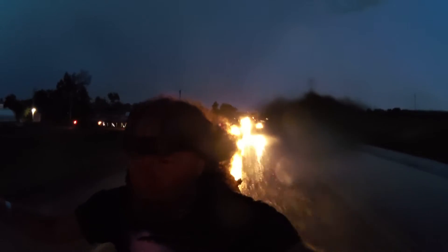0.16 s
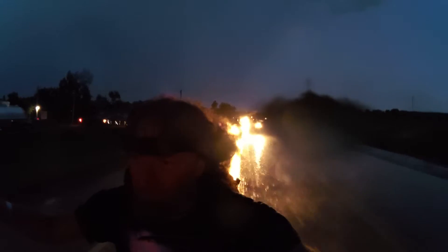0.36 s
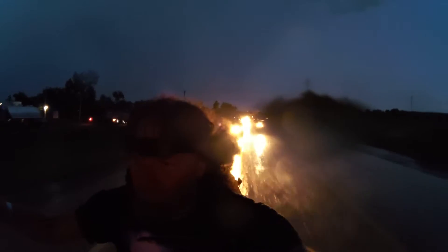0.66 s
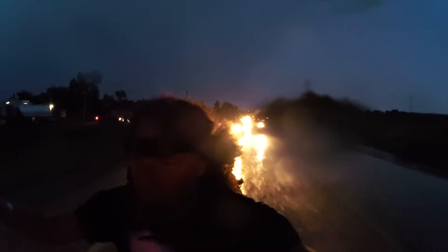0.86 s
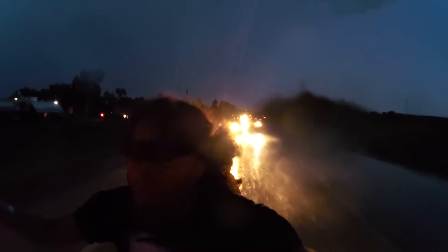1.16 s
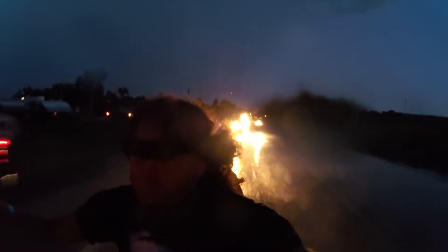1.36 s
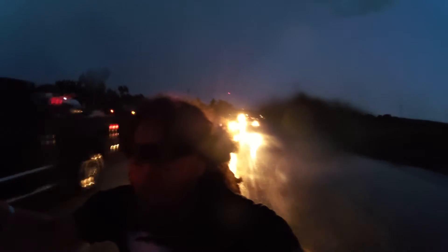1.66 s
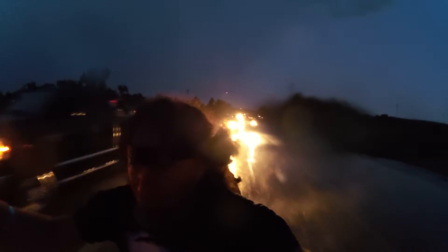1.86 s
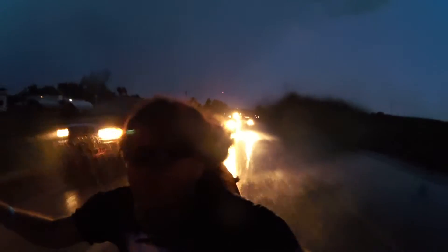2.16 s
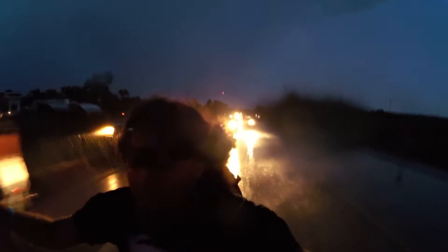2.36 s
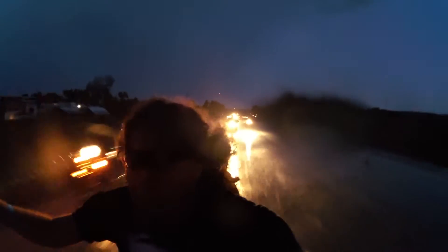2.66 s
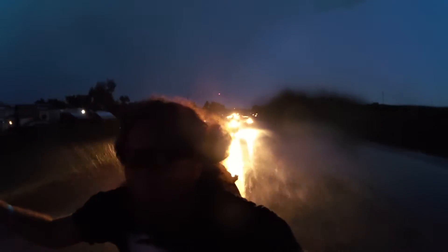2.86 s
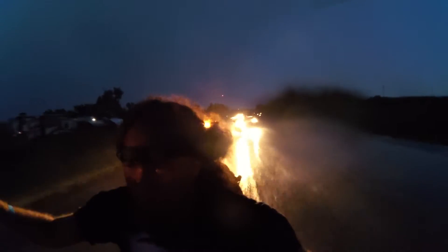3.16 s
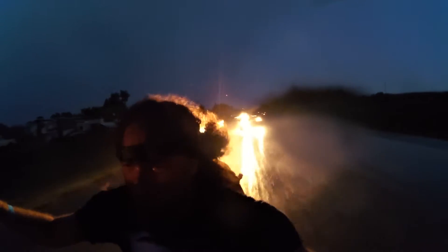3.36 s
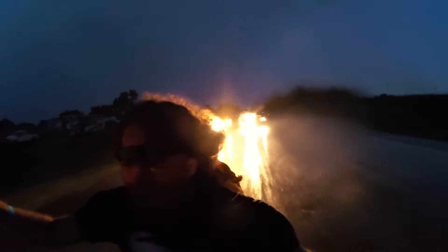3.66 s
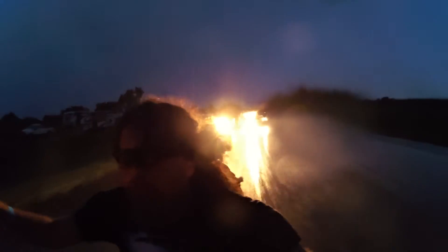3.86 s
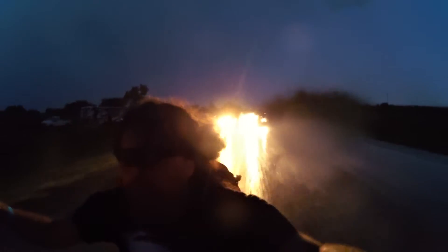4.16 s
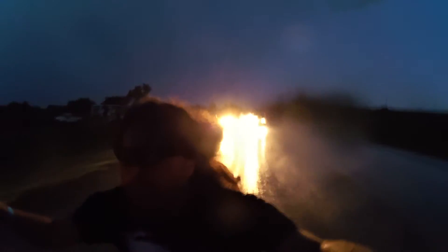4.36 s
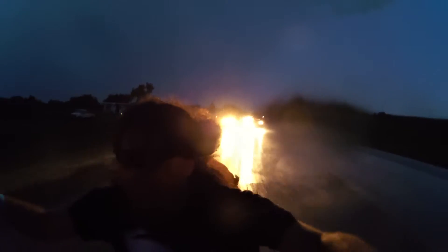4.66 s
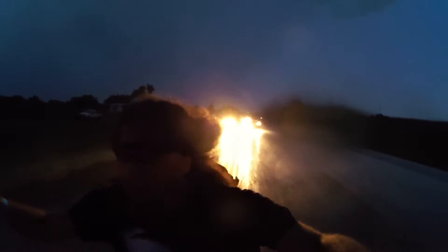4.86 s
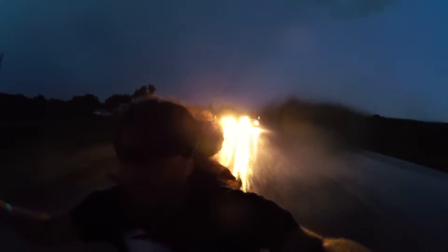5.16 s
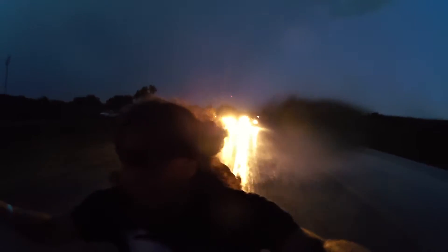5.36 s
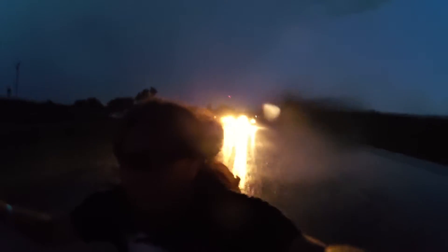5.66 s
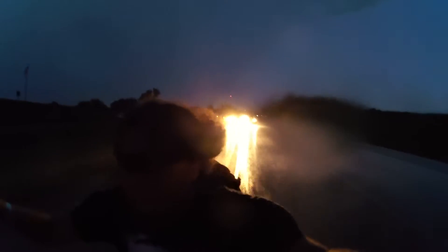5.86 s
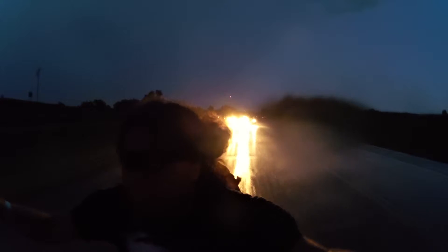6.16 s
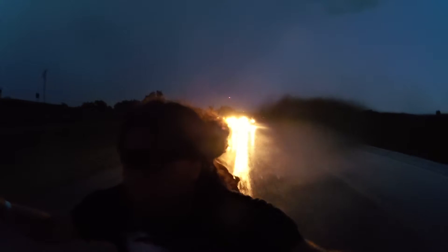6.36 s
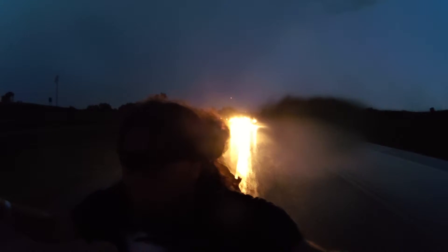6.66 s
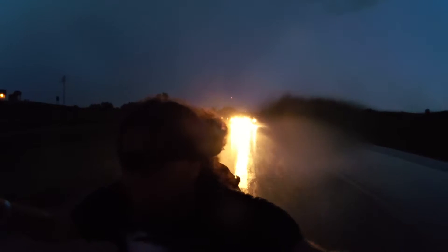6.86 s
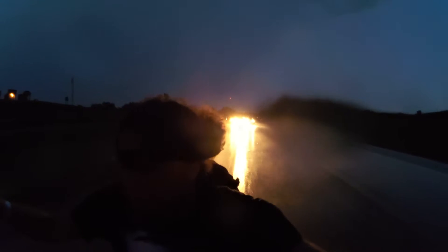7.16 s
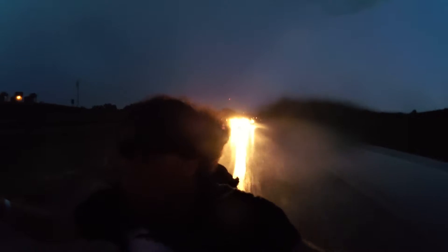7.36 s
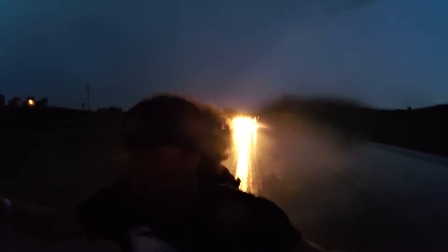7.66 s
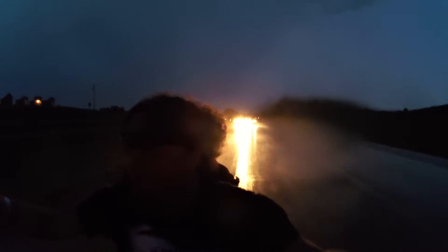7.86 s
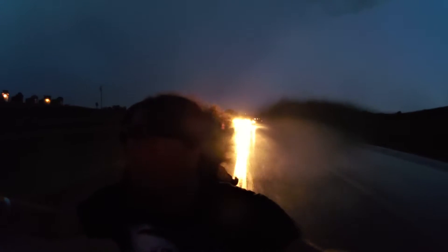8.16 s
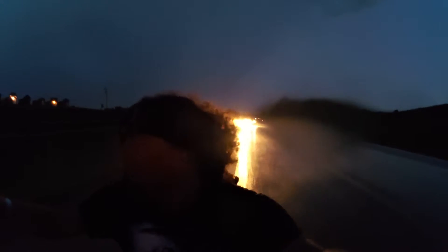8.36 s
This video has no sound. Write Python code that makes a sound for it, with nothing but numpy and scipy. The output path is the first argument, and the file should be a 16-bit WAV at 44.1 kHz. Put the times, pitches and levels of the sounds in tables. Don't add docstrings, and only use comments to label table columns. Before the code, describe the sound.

A big twin-cylinder motorcycle throbs close and muffled on a wet road, pulls harder, drops for a gear change, then cruises as raindrops tick sharply.

```python
import sys
import numpy as np
from scipy import signal
from scipy.fft import rfft, irfft, next_fast_len
from scipy.io import wavfile
from scipy.ndimage import uniform_filter1d, map_coordinates

SR = 44100
rng = np.random.default_rng(int(sys.argv[2]) if len(sys.argv) > 2 else 0)


def magnitude_from_level(level_db):
    exponent = np.asarray(level_db, float) / 20
    return 10 ** exponent


def master_out(mix):
    frames = np.transpose(np.atleast_2d(mix))
    ceiling = np.clip(frames, -1, 1)
    pcm = np.round(ceiling * 32767).astype(np.int16)
    wavfile.write(sys.argv[1], SR, pcm)


N = 376173

# (time [s], engine cycles a second [Hz])
SPEED = [(0, 16.52), (.9, 16.62), (1.2, 17.01), (1.8, 18.43), (3, 21.9), (3.6, 23.52), (4.2, 24.98),
         (4.7, 26.15), (4.78, 26), (5.17, 21), (5.33, 20.2), (5.49, 18.7), (5.7, 18.77), (6.3, 19.34),
         (6.9, 19.66), (7.5, 19.83), (8.1, 19.83), (8.53, 19.6)]
# (time [s], level [dB])
THROTTLE = [(0, -26.5), (.8, -27.5), (1.2, -21.5), (1.45, -23.5), (2.06, -20.5), (2.85, -19), (3.54, -15),
            (3.96, -17.5), (4.49, -16), (4.7, -15.5), (4.75, -26), (5.22, -31), (5.3, -19), (5.55, -22.5),
            (6.6, -23.5), (7.3, -25), (7.7, -25), (8.53, -31.5)]
# (time [s], level [dB])
SPRAY = [(0.0, -32.5), (0.12, -36), (0.52, -34), (1.09, -32), (1.85, -41.5), (2.49, -40), (4.2, -37.5),
         (4.89, -36), (5.25, -35.5), (5.61, -41), (6.06, -41), (7.82, -34), (8.2, -38), (8.53, -39)]
# (level [dB], slope [dB per dB of spray], change in a hard pull [dB], change in next gear [dB])
ROAD_LAYERS = [
    (-24, 0.13, -7, -3),
    (-30.5, .5, -2, -1),
    (-40.5, 0.75, 0.75, -1),
    (-50.5, 0.96, 1.4, 0.3),
]
# (level unloaded [dB], change at full load [dB], change in the higher gear [dB])
MESH_LEVELS = [
    (-39.5, -1, 1.8),
    (-37, -10, -3),
    (-60, -10.5, 18),
    (-43.5, -9, -2),
]
MESH_ORDERS = [(62, .5), (122.5, 1.6), (44.5, .3), (38, .4)]
# (tones per engine cycle, level [dB])
BRACKET_ORDERS = [(8, -34), (10, -23), (15, -29)]
# (part of the cycle, level [dB])
KNOCKS = [(.04, -7.5), (0.212, 1), (0.331, -1.5), (.59, -2), (.74, -0.5), (0.902, 4)]
# (time [s], length [s], part of the cycle, ring [Hz], level [dB])
TAPPETS = [(-.3, 1.75, .26, 1862, -41.5), (-.3, 2.1, 0.23, 1994, -41), (-.3, 1.9, .75, 1036, -43.5),
           (-.3, 1.7, .75, 625, -39), (4.897, 1, 0.25, 1868, -41), (2.1, .7, .24, 1863, -44.5)]
# (time [s], peak [dB], crack [dB])
DROPS = [(0.142, -26, -51.5), (1.0828, -7.5, -44.5), (1.1787, -23.5, -55.5), (1.268, -24.5, -58),
         (1.281, -18.5, -60), (1.351, -22.5, -49), (1.419, -17, -45), (1.6892, -22, -48),
         (1.7447, -22, -61), (1.8915, -24.5, -68), (2.8803, -9, -42.5), (3.9458, -27, -58),
         (4.871, -27, -68), (4.9008, -24, -69), (4.94, -25, -68), (5.008, -21.5, -51),
         (5.2824, -30, -60), (5.2984, -19, -56), (5.6742, -28.5, -51), (5.98, -19, -44.5),
         (6.0323, -11.5, -52.5), (6.1928, -14, -46.5), (6.3923, -22.5, -68), (6.5158, -12.5, -50.5),
         (6.6647, -17.5, -60.5), (6.754, -23, -58), (6.995, -18.5, -55), (7.0729, -15, -45),
         (7.1157, -21.5, -48), (7.3782, -21.5, -51),
         (0.6125, -32, -48), (0.6684, -38.5, -62), (0.9033, -33, -69), (1.1573, -36, -61),
               (1.2176, -27, -54), (1.2514, -28, -56), (2.604, -28.5, -76.5), (2.6364, -42, -66),
               (2.7053, -27, -59), (3.0829, -29, -67), (3.5793, -37, -64), (3.6354, -37, -66),
               (3.9054, -40, -64), (4.1749, -29, -68), (4.3111, -33, -54), (4.8454, -37, -65),
               (5.1891, -33, -60), (5.467, -26.5, -53), (5.5583, -31, -62), (6.0781, -33, -64),
               (6.6947, -34, -64), (7.2365, -33, -60), (7.5173, -27.5, -62), (7.5901, -29, -53),
               (7.671, -27, -62), (7.6804, -23.5, -57), (7.7842, -33, -62), (7.9154, -22, -59),
               (8.3883, -27, -67), (8.4961, -19.5, -62)]
# (time [s], length [s], level [dB])
SPLASHES = [(4.868, .014, -37), (4.898, .014, -40), (4.936, .022, -41), (5.7, .026, -42),
            (4.84, 0.71, -54.5)]
# (time [s], length [s], start [Hz], end [Hz], width [Hz], level [dB])
SQUEAKS = [
    (4.761, 0.55, 244, 224.6, 14, -23),
    (4.82, .5, 1010, 835, 8, -41),
    (5.335, .095, 830, 818, 4, -28),
    (5.944, 0.058, 7250, 7400, 500, -67),
    (5.972, .031, 8100, 8200, 500, -78),
    (7.098, 0.026, 7500, 6940, 500, -69),
    (7.122, 0.028, 6570, 6200, 1200, -67),
]

PIPE = [(72.6, 17, -8), (155, 6.1, -14), (231, 50, -6), (288.1, 17, 8), (337.7, 40.2, 4.5), (378.2, 52, 3),
        (524, 12, -21.5), (592, 690, -19), (910, 230, -15)]
BOOM = [(116, 77, -15.5), (164.2, 8.05, 9), (203.3, 19, 0), (250.7, 14.6, 7.5), (362.2, 20, -0.5),
        (402.4, 25.4, -0.5)]
ROAR = [(386, 43, 1.5), (480, 30.4, 1.5), (612.4, 45, -1), (749.4, 65, 0), (862.4, 43.7, -3),
        (1079, 210, -12.5)]
WHOOSH = [(1264, 13, -11.5), (1358, 51, -1.5), (1513, 140, -2), (1844, 94, 4), (2017, 370, -7),
          (2330, 140, -4.5)]
HISS = [(3226, 320, -0.5), (3715, 130, 4), (4380, 170, -5), (4887, 240, -6)]
MESH_PANELS = [(607, 23, -0.5), (752, 12, -4), (820, 110, 0), (997, 41, 5), (1229, 20, 0), (1380, 44, -1.5),
               (1600, 40, 1), (2080, 100, -0.5), (2390, 130, -2.5)]
SHELL = [(3740, 1400, 7), (5100, 1200, 5), (2420, 260, -16)]

CRACK = [(4500, -35.5), (5800, -4.5), (7000, -10.5), (8300, -22.5), (9500, -34.5), (11000, -29),
         (12500, -38.5), (14000, -76)]
SEAL = [(30, -34.5), (52, -33), (63, -2), (5200, -3.5), (5600, -16), (6400, -26.5), (8000, -56)]
PREAMP = [(4000, -7.5), (6000, -5.5), (8000, -6), (10000, -20.5), (12400, -18.5), (13000, -60)]
HANDLEBAR = [(62, -32), (68, -30), (73, -24.5), (79, -23), (84, -39), (96, -35.5), (100, -25.5),
             (105, -30.5)]

SHUT_S, CLUTCH_S, SETTLED_S = 4.71, 5.25, 5.55
SECOND = .55


def unit(x):
    return x / np.sqrt(np.mean(x ** 2) + 1e-20)


def curves(rows):
    s, *cols = np.transpose(rows)
    return [np.interp(np.arange(N) / SR, s, c) for c in cols]


def wobble(rate):
    at = np.arange(0, N + 16, 16)
    knots = rng.standard_normal(int(N * rate / SR) + 5)
    return np.interp(np.arange(N), at, map_coordinates(knots, [at * rate / SR]))


def filtered(x, response):
    m = next_fast_len(N + SR // 2)
    return irfft(rfft(x, m) * response(np.fft.rfftfreq(m, 1 / SR)), m)[..., :N]


def causal(points):
    def response(hz):
        f, db = np.transpose(points)
        level = magnitude_from_level(np.interp(np.log(hz + 1), np.log(f), db))
        c = irfft(np.log(level + 1e-6))
        c[1:len(c) // 2] *= 2
        c[len(c) // 2 + 1:] = 0
        return np.exp(rfft(c))
    return response


def modes(table):
    def response(hz):
        f = hz[::8]
        total = 0
        for k, (centre, width, db) in enumerate(table):
            damping = 1j * f * width
            total = total + (-1) ** k * magnitude_from_level(db) * damping / (centre * centre - f * f + damping)
        return np.interp(hz, f, total)
    return response


def patchy(depth_db):
    z = signal.stft(rng.standard_normal(N), nperseg=1024)[2]
    field = uniform_filter1d(uniform_filter1d(rng.standard_normal(z.shape), 5, 0), 6, 1)
    return signal.istft(z * magnitude_from_level(depth_db * unit(field)), nperseg=1024)[1][:N]


def train(turns, parts, sizes_db, scatter_db):
    out = np.zeros(N)
    for part, db in zip(parts, sizes_db):
        at = np.flatnonzero(np.diff(np.floor(turns - part)) > 0)
        out[at] += magnitude_from_level(db + scatter_db[at] * rng.standard_normal(len(at)))
    return out


def since_firing(turns):
    part = turns % 1
    return np.where(part < SECOND, part, part - SECOND)


def overrun():
    return curves([(0, 0), (SHUT_S, 0), (SHUT_S + .02, 1), (CLUTCH_S, 1), (SETTLED_S, 0), (9, 0)])[0]


def preamp(heard):
    flare = 1 + 1.5 * uniform_filter1d(heard ** 2, size=90) / .05
    return magnitude_from_level(-92.5) * flare * unit(filtered(rng.standard_normal(N), causal(PREAMP)))


def buffet():
    flutter = lambda f: modes([(34, 16, 0)])(f) ** 2
    return magnitude_from_level(-59 + 3.9 * wobble(3)) * unit(filtered(rng.standard_normal(N), flutter))


def drizzle():
    specks = rng.random((260, 2))
    at = (specks[:, 0] * N).astype(int)
    sizes = magnitude_from_level(-52 - 6 * np.log(specks[:, 1] + 1e-3))
    return filtered(np.bincount(at, sizes, minlength=N), causal(CRACK))


def raindrops():
    ring, edge, t = np.zeros(N + 99), np.zeros(N + 99), np.arange(56) / SR
    for s, db, crack_db in DROPS:
        start, peak_db = round(s * SR), db + 0.35
        burst_hz = 3430 + 350 * rng.uniform(-1.2, 1)
        burst = np.hanning(len(t)) ** 0.12 * np.sin(2 * np.pi * burst_hz * t)
        ring[start:][:len(t)] += magnitude_from_level(peak_db - 7.5) * burst
        ring[start + 6] += magnitude_from_level(peak_db + 10)
        edge[start + 12] += magnitude_from_level(crack_db + 36.5)
    wall = causal([(1800, -14), (2600, 6.0), (5500, -9), (6800, -13.5), (9500, -25.5), (11000, -17.5),
                   (14000, -53.0)])
    shell = filtered(ring[:N], lambda f: modes(SHELL)(f) * wall(f))
    return shell + filtered(edge[:N], causal(CRACK))


def splashes():
    t = np.arange(N) / SR
    swell = sum(magnitude_from_level(db) * np.sin(np.pi * np.clip((t - s) / length, 0, 1)) ** 2 for s, length, db in SPLASHES)
    grains = rng.standard_normal(N) * (rng.random(N) < .03)
    return swell * unit(filtered(grains, lambda f: modes(SHELL)(f) * causal(SEAL)(f)))


def squeaks():
    out = np.zeros(N)
    for s, length, hz0, hz1, width_hz, db in SQUEAKS:
        t = np.arange(round(length * SR)) / SR
        glide = np.sin(2 * np.pi * np.cumsum(hz0 + (hz1 - hz0) * t / length) / SR)
        swell = np.sin(np.pi * t / length) ** 0.2
        rough = 1 + np.tanh(width_hz / 25) * wobble(width_hz)[:len(t)]
        out[round(s * SR):][:len(t)] += magnitude_from_level(db) * swell * rough * glide
    return out


def road_levels(speed):
    (spray_db,) = curves(SPRAY)
    (after,) = curves([(0, 0), (SHUT_S, 0), (CLUTCH_S, 1), (9, 1)])
    pulling = (1 - after) * (1 + np.tanh((speed - 18.7) / 0.14)) / 2
    swing_db = spray_db - spray_db.mean()
    return [db + slope * swing_db + pull_db * pulling + gear_db * after + .9 * wobble(4.5)
            for db, slope, pull_db, gear_db in ROAD_LAYERS]


def road(turns, ragged, levels_db):
    beat = np.exp(-((since_firing(turns) - .14) / .09) ** 2)
    gust = wobble(20)
    knocks = unit(train(turns, *np.transpose(KNOCKS), 1.5 + 5 * ragged))
    # (resonances, share of knocks, lock to the firings, patch depth [dB], gust depth [dB])
    layers = [(BOOM, .8, .3, 1.5, .8), (ROAR, .33, .9, 1.2, .9), (WHOOSH, .06, .8, 1.2, .9),
              (HISS, 0, .45, 1.2, 1.2)]
    out = np.zeros(N)
    for db, (panels, steady, lock, depth_db, gust_db) in zip(levels_db, layers):
        shake = unit(patchy(depth_db) * (1 + lock * beat) * magnitude_from_level(gust_db * gust))
        share = steady * (1 - ragged)
        blows = np.sqrt(1 - share) * shake + np.sqrt(share) * knocks
        out += magnitude_from_level(db + 4.5) * unit(filtered(blows, modes(panels)))
    return out


def tappets(turns):
    t, out = np.arange(N) / SR, np.zeros(N)
    for s, length, part, hz, db in TAPPETS:
        from_knock = (turns - part + .5) % 1 - .5
        rattle = (.3 + np.exp(-(from_knock / .13) ** 2)) * rng.standard_normal(N)
        blows = unit(train(turns, [part - .06], [0], np.full(N, 3.))) + .5 * unit(rattle)
        ring = filtered(blows, lambda f: modes([(hz, 67, 0)])(f) ** 2)
        swell = np.abs(np.sin(np.pi * np.clip((t - s) / length, 0, 1))) ** 0.37 * (t < s + length)
        out += magnitude_from_level(db) * swell * unit(ring)
    return out


def bracket_tones(turns, load):
    tones = sum(magnitude_from_level(db + 1.5 * wobble(12)) * np.sin(2 * np.pi * order * turns + .3 * wobble(20))
                for order, db in BRACKET_ORDERS)
    return magnitude_from_level(-8.5 * load) * filtered(tones, modes([(159.6, 4.3, 0), (247.6, 5.1, 0)]))


def gears(turns, load, shifted):
    throb = 1 + 0.39 * np.cos(2 * np.pi * turns)
    tones = np.zeros(N)
    for (order, blur), (db, load_db, gear_db) in zip(MESH_ORDERS, MESH_LEVELS):
        level = magnitude_from_level(db + load_db * load + gear_db * shifted + 1.1 * wobble(25))
        tones += level * np.sin(2 * np.pi * order * turns + blur * wobble(60))
    return throb * filtered(tones, modes(MESH_PANELS))


def frame_shake(turns, speed, load, exhaust_db):
    bar_db = np.interp(4 * speed, *np.transpose(HANDLEBAR)) - 5 * (load - 0.27)
    jolt_db = 3.5 * np.exp(-np.abs(np.arange(N) / SR - SHUT_S - .07) / .06)
    shake = magnitude_from_level(bar_db) + magnitude_from_level(-31.5 + jolt_db) * overrun()
    unsteady = magnitude_from_level(0.78 * wobble(4) + 2.0 * wobble(9))
    hum = shake * unsteady * np.sin(2 * np.pi * 4 * turns + 0.35 * wobble(33))
    lope = magnitude_from_level(2 * (exhaust_db + 16) - 37 + 1.5 * wobble(6)) * np.sin(2 * np.pi * 3 * turns)
    return np.sqrt(2) * (hum + lope)


def burning(load):
    light, full = .3, .03
    ragged = full + (light - full) * np.exp(-4 * load)
    rear_db = np.maximum(4 - 12 * load, -3.5)
    return np.maximum(ragged, .9 * overrun() ** 1.5), rear_db


def exhaust(turns, exhaust_db, ragged, rear_db):
    scatter_db = .9 + 6 * np.minimum(ragged, .35)
    front = train(turns, [0], [0], scatter_db)
    bangs = front + magnitude_from_level(rear_db) * train(turns, [SECOND], [0], scatter_db)
    puffs = rng.standard_normal(N) * (0.46 + np.exp(-since_firing(turns) / 0.19))

    def muffler(f):
        late = lambda s: np.exp(-2j * np.pi * f * s)
        paths = 0.72 + late(0.0032) + 0.27 * late(0.0126)
        return modes(PIPE)(f) * paths / (1 + 1j * f / 500) ** 2

    tonal, breath = unit(filtered(bangs, muffler)), unit(filtered(puffs, muffler))
    mix = np.sqrt(1 - ragged) * tonal + np.sqrt(ragged) * breath
    band = filtered(mix, modes([(332, 67, 0.017)]))
    drift = np.sqrt(np.abs(uniform_filter1d(band ** 2, size=SR // 3)))
    return magnitude_from_level(exhaust_db) * mix / drift


def scene():
    (speed,), (exhaust_db,) = curves(SPEED), curves(THROTTLE)
    light_db, full_db = -28, -15
    load = np.clip((exhaust_db - light_db) / (full_db - light_db), 0, 1)
    shifted = np.arange(N) / SR > SETTLED_S
    turns = np.cumsum(speed) / SR + .64
    ragged, rear_db = burning(load)
    exhaust_db = exhaust_db + 0.5 * (1 - load) * wobble(13)

    outside = road(turns, ragged, road_levels(speed))
    outside += tappets(turns) + bracket_tones(turns, load) + gears(turns, load, shifted)
    outside += frame_shake(turns, speed, load, exhaust_db) + exhaust(turns, exhaust_db, ragged, rear_db)
    inside = filtered(outside, causal(SEAL))
    on_shell = drizzle() + raindrops() + splashes() + squeaks()
    return (inside + on_shell + buffet() + preamp(inside))[None]


def band_limit(x):
    return signal.sosfilt(signal.butter(12, 13700, fs=SR, output="sos"), x)


def record(dry):
    mix = dry / (1 + np.abs(dry / 1.1) ** 4) ** (1 / 4)
    mix = mix * np.minimum(np.arange(N)[::-1] / 120, 1)
    return band_limit(mix)


dry = scene()
out = record(dry)
master_out(out)
```